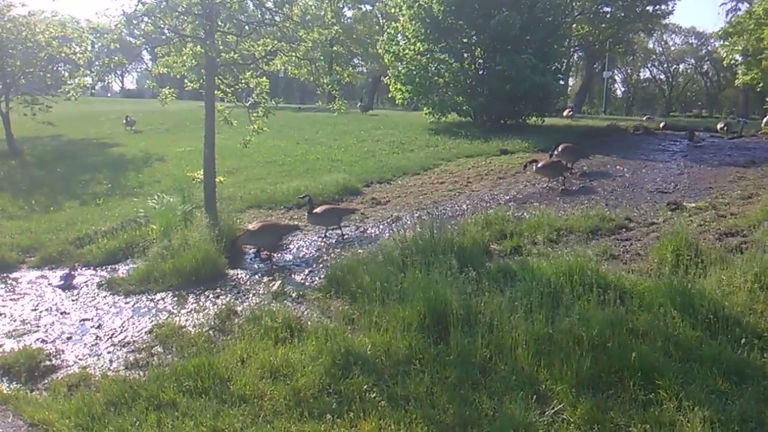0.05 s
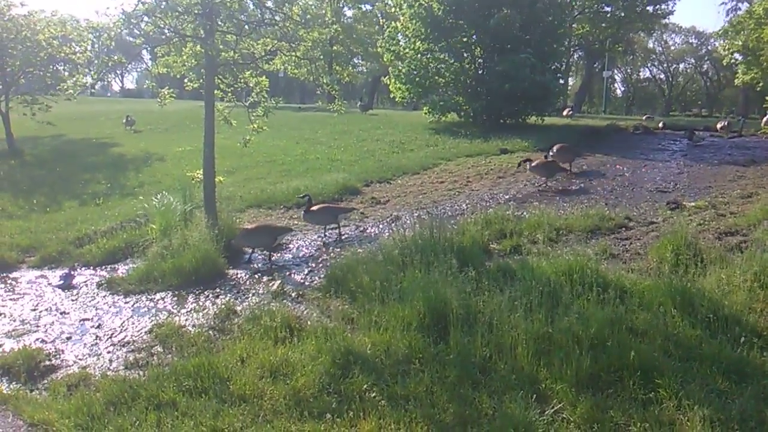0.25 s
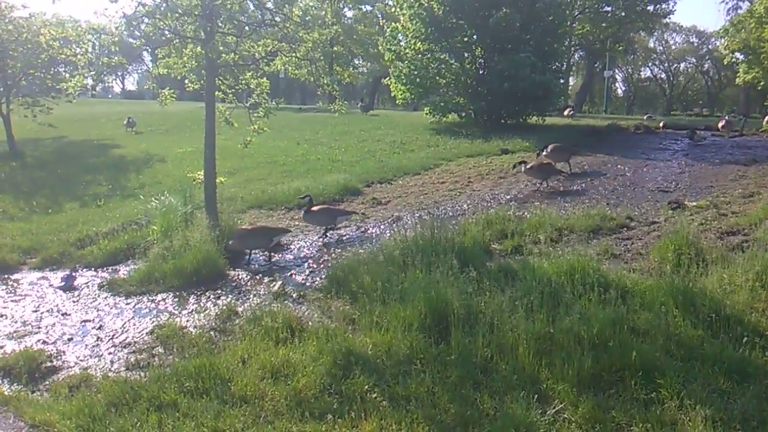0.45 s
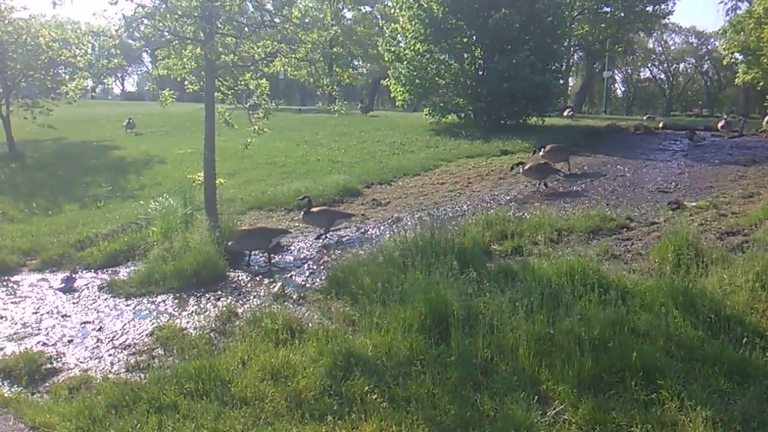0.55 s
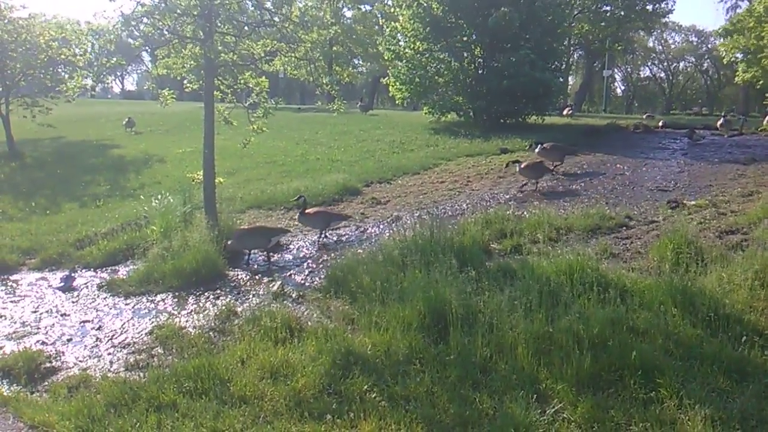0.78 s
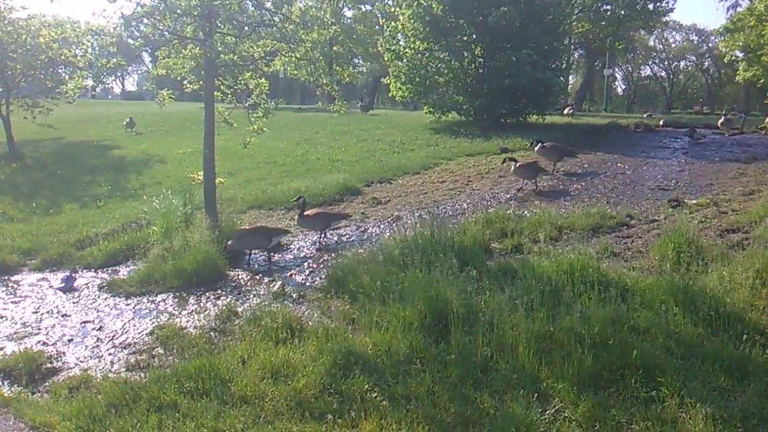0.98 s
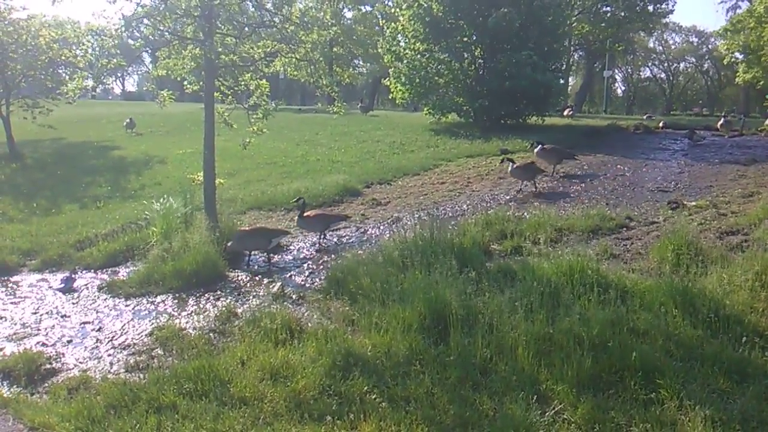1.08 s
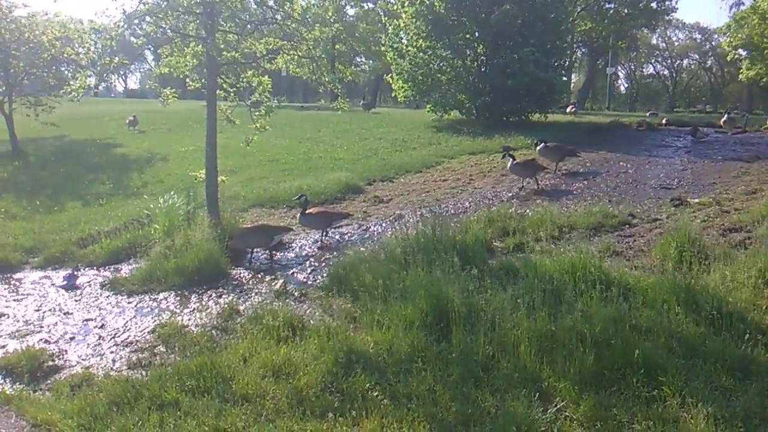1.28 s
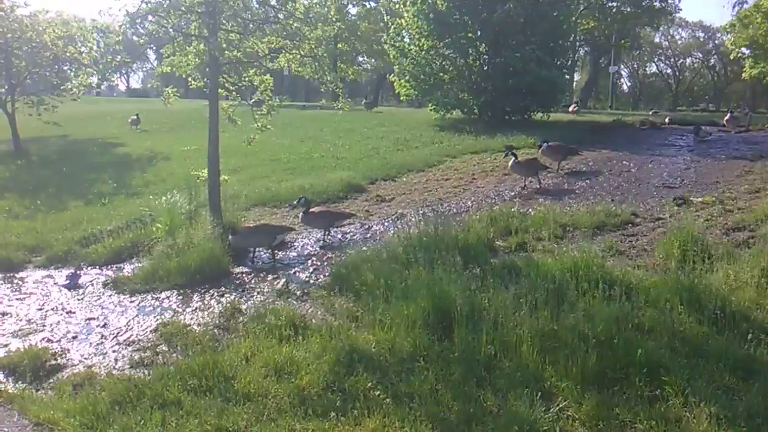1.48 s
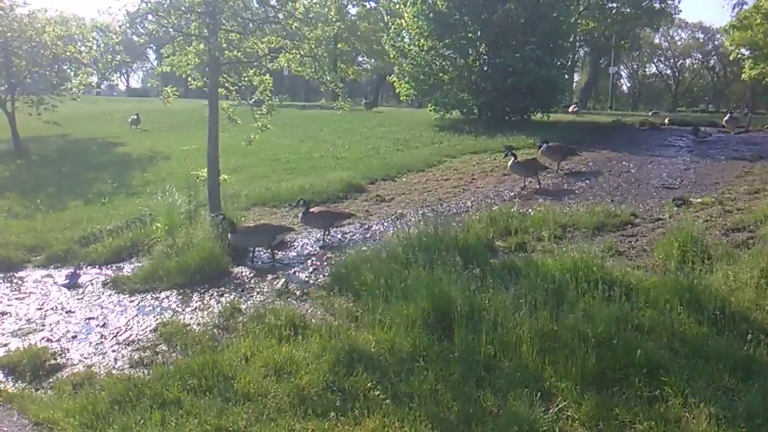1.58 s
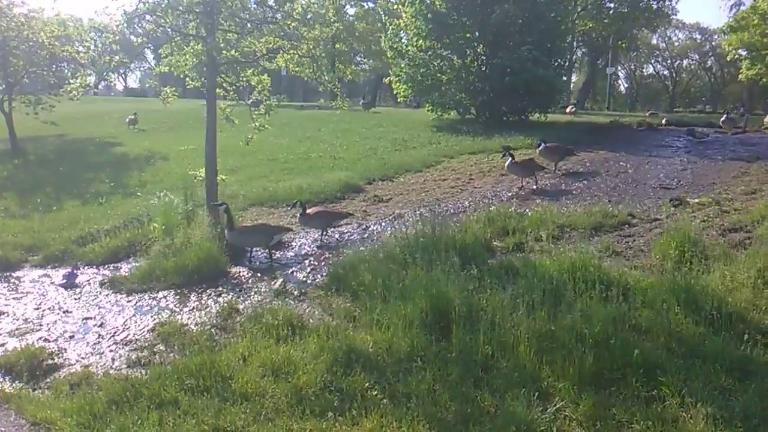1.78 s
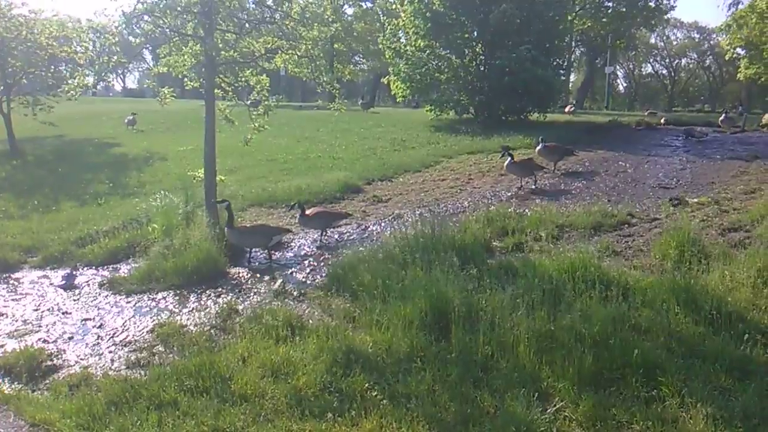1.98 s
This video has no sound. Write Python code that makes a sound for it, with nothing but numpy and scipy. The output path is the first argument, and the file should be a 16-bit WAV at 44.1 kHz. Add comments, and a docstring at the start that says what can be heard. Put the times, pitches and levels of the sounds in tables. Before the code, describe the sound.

Faint birds chirp across a quiet park, mostly to the left, growing busier halfway through. Low wind puffs bump the microphone early, with a soft rustle and small ticks, then return near the end over a soft rumble.

```python
"""Distant songbirds whistle, warble and buzz in a quiet park by a muddy stream; another bird gives dry
chacks, noisy pulses through its throat. The trees return a faint echo. Puffs of wind thump on the two
microphone ports, mostly the right one. Close by are a soft rustle and a few small ticks; behind it all
lie a far-off rumble with faint low notes and a thin hiss."""
import sys
import numpy as np
from scipy import signal
from scipy.fft import rfft, irfft, next_fast_len
from scipy.io import wavfile
from scipy.ndimage import map_coordinates

SR = 44100
rng = np.random.default_rng(int(sys.argv[2]) if len(sys.argv) > 2 else 0)


def to_wav(sig):
    """Store sig (one row per channel, or 1-D mono) as 16-bit WAV at the path in sys.argv[1].

    Samples outside -1..1 are clipped; the rate is SR.
    """
    pcm = np.clip(np.atleast_2d(sig), -1, 1) * 32767
    pcm = np.round(pcm).astype(np.int16)
    wavfile.write(sys.argv[1], SR, pcm.T)  # frames by channels


N = 90404
SONG_LEAD_S, CHACK_LEAD_S, RUMBLE_LEAD_S = 0.000385, -0.000115, 0.000135  # left port ahead of right


def amp(db):
    return 10 ** (np.asarray(db) / 20)


def unit(x):
    """x scaled to rms 1."""
    return x / np.sqrt(np.mean(x ** 2) + 1e-20)


def colour(points):
    """Gain against frequency from (f/Hz, level/dB) points on a log axis."""
    f, db = np.transpose(points)
    return lambda hz: amp(np.interp(np.log(hz + 1), np.log(f), db))


def band(centre_hz, width_hz):
    """Gain against frequency of a round-shouldered band."""
    return lambda hz: 1 / (1 + (2 * (hz - centre_hz) / width_hz) ** 4)


def filtered(x, response):
    """x through a filter given as gain against frequency."""
    n = x.shape[-1]
    padded = next_fast_len(n + 8192)
    return irfft(rfft(x, padded) * response(np.fft.rfftfreq(padded, 1 / SR)), padded)[..., :n]


def noise(response, size=16384):
    """Coloured noise of rms 1."""
    return unit(filtered(rng.standard_normal(size), response))


def wobble(t, rate):
    """A smooth random curve, rate knots a second."""
    return map_coordinates(rng.standard_normal(256), [t * rate], mode="wrap")


def clock(length):
    """Sample times of one short event, in seconds."""
    return np.arange(int(np.clip(length * SR, 64, 16000))) / SR


def swell(t, rise, fall):
    """Attack, hold and release; rise and fall are shares of the note."""
    progress = t / t[-1]
    attack = np.sin(np.pi / 2 * np.clip(progress / rise, 0, 1))
    release = np.sin(np.pi / 2 * np.clip((1 - progress) / fall, 0, 1))
    return attack * release


def pan(db):
    """Left and right gains of unit mean power, the left louder by db."""
    return unit(amp([db / 2, -db / 2]))


def lead(x, lead_s):
    """Sound from one side reaches the left port earlier by lead_s."""
    return filtered(x, lambda hz: np.exp(1j * np.pi * lead_s * np.array([hz, -hz])))


def add(out, start, sound, gains):
    """Mix a mono sound into the stereo track at start seconds."""
    i = round(start * SR)
    sound = sound[max(-i, 0):max(N - i, 0)]
    out[:, max(i, 0):max(i, 0) + len(sound)] += np.outer(gains, sound)


def background(width=0.33):
    """A far rumble, nearly alike at both ports, and a smooth hiss, unrelated between them."""
    # spectra of the rumble and the hiss: f/Hz, density/dB
    rumble_spectrum = [(20, -5.5), (40, -6.5), (62, -4), (88, 2.5), (125, -8.5), (200, -15), (380, -18.5),
                       (600, -27), (1000, -32), (1500, -48.5), (3000, -92.5)]
    hiss_spectrum = [(300, 3), (1200, 4), (1600, -0.5), (2200, 2), (3000, 1.5), (4300, -2), (5500, -1),
                     (7200, -3), (8800, 2), (10500, 3), (12000, -5.5), (14000, -10)]
    # the hiss leans left: f/Hz, left over right/dB
    hiss_balance = [(1000, 1), (2500, 3), (9000, 3.5)]
    mid, side = [noise(colour(rumble_spectrum), size=N) for _ in range(2)]
    left, right = [noise(colour(hiss_spectrum), size=N) for _ in range(2)]
    rumble = unit(np.array([mid + width * side, mid - width * side]))
    rumble_db = -58.5 - 0.2 * wobble(np.arange(N) / SR, rate=6.43)
    hiss = unit(np.array([filtered(left, colour(hiss_balance)), right]))
    return amp(rumble_db) * lead(rumble, RUMBLE_LEAD_S) + amp(-70.5) * hiss


def low_notes():
    """Blurred, hollow notes far off to the left, barely above the rumble."""
    # noise-band notes: t/s, length/s, centre/Hz, width/Hz, level/dB
    notes = [(.9, 0.038, 367, 89, -69.5), (1.03, .11, 373, 159, -65.5), (1.085, 0.11, 1044, 393, -72.5),
             (1.19, 0.096, 1140, 250, -77), (1.195, 0.026, 317, 71, -61), (1.28, 0.075, 887, 89.5, -76),
             (1.78, 0.083, 342, 151, -66.5), (1.905, 0.085, 315, 126, -64.5)]
    out = np.zeros((2, N))
    for start, length, centre_hz, width_hz, db in notes:
        t = clock(length)
        note = unit(noise(band(centre_hz, width_hz))[:len(t)])
        add(out, start, amp(db) * note * swell(t, rise=0.24, fall=0.42), pan(db=8))
    return lead(out, RUMBLE_LEAD_S)


def rustles(rough_db=1.5, grain_hz=400):
    """Brief grainy rustles near the microphone during the first gust."""
    # soft noise bursts: t/s, length/s, centre/Hz, width/Hz, level/dB
    bursts = [(0.203, 0.053, 1920, 2630, -68.5), (0.241, 0.079, 3500, 3230, -69.5),
              (0.247, .1, 9500, 3800, -69)]
    out = np.zeros((2, N))
    for start, length, centre_hz, width_hz, db in bursts:
        t = clock(length)
        level = amp(db + rough_db * wobble(t, grain_hz)) * swell(t, rise=0.55, fall=0.4)
        for gains in np.diag(pan(db=6)):  # each port gets its own noise
            add(out, start, level * unit(noise(band(centre_hz, width_hz))[:len(t)]), gains)
    return out


def ticks(attack_s=0.00033):
    """Small dry clicks, close on the left, that die at once."""
    # clicks: t/s, level of half the peak/dB, centre/Hz, width/Hz, t60/s
    clicks = [(0.2627, -58.5, 2780, 2180, 0.034), (0.3105, -61, 3330, 820, 0.06),
              (0.3117, -61.5, 8500, 6000, 0.013), (0.4694, -58, 3520, 950, 0.012),
              (.914, -67, 3130, 1200, 0.0072), (1.89, -56.5, 2670, 900, 0.024)]
    out = np.zeros((2, N))
    for start, db, centre_hz, width_hz, t60 in clicks:
        t = clock(t60)
        envelope = amp(-60 * t / t60) * (1 - np.exp(-t / attack_s))
        click = noise(band(centre_hz, width_hz))[:len(t)] * envelope
        add(out, start, 2 * amp(db) * click / np.abs(click).max(), pan(db=10))
    return out


def wind(low_slope=1.33, high_slope=2.81, port_top_hz=444):
    """Each puff shakes one microphone port; smaller eddies sound higher."""
    # wind puffs: peak t/s, length/s, level/dB, eddy f/Hz, port (0 left, 1 right)
    puffs = [(.0, .04, -42, 77, 1), (0.199, 0.073, -44, 93, 1), (.236, 0.049, -23.5, 86, 1),
             (0.252, 0.054, -28.5, 157, 1), (0.31, 0.14, -43, 135, 1), (0.322, 0.034, -38, 65.5, 1),
             (.38, 0.092, -44, 73.4, 1), (.527, 0.0437, -46, 63.6, 1), (1.062, .022, -44, 184, 1),
             (1.363, 0.039, -41, 176, 1), (1.406, 0.049, -42.5, 72.5, 1), (1.506, 0.085, -47, 130, 1),
             (1.565, 0.071, -43, 65, 1), (1.651, 0.044, -36.5, 154, 1), (1.689, 0.095, -40, 225, 1),
             (1.711, 0.092, -32, 72.4, 1), (.32, 0.11, -54, 80, 0), (0.406, .07, -54.5, 82, 0),
             (1.161, .11, -54.5, 73, 0), (1.278, 0.059, -60, 75, 0), (1.481, 0.067, -48.5, 79, 0),
             (1.627, 0.059, -46, 73.6, 0), (1.756, 0.054, -43.5, 72, 0)]
    out = np.zeros((2, N))
    for peak, length, db, eddy_hz, port in puffs:
        def eddy_at_port(hz):
            ratio = hz / eddy_hz
            eddy = ratio ** low_slope / (1 + ratio ** (low_slope + high_slope))
            return eddy / np.hypot(1, (hz / port_top_hz) ** 3)

        n = len(clock(length))
        turbulence = noise(eddy_at_port)[-n - 2048:][:n]
        puff = unit(turbulence * np.hanning(n))
        add(out, peak - length / 2, amp(db) * puff, [port == 0, port == 1])
    return out


def tree_echo(x, t60=0.31, build_s=0.0074):
    """A thin diffuse echo from the trees."""
    t = np.arange(SR // 2) / SR
    tail = rng.standard_normal((2, len(t))) * amp(-60 * t / t60) * (1 - np.exp(-t / build_s))
    return signal.fftconvolve(x, tail / np.linalg.norm(tail[0]), axes=1)[:, :N]


def chatter(count=18, pitch_hz=3100, spread=0.21):
    """Blurred chirps of the farthest birds, at random times and pitches."""
    out = np.zeros((2, N))
    n = len(clock(length=0.048))
    for when, pitch in rng.random((count, 2)):
        centre_hz = pitch_hz * (1 + spread * (2 * pitch - 1))
        chirp = noise(band(centre_hz, width_hz=500))[:n] * np.hanning(n)
        add(out, when * N / SR, amp(-79) * chirp, pan(db=-1))
    return out


def chacks(pulse_hz=85, pulse_decay=0.93):
    """A bird left of centre sends uneven noisy pulses through gliding throat resonances."""
    # dry calls: t/s, length/s, level/dB, pan/dB, share by which the resonances rise
    calls = [(0.132, 0.016, -71.5, 10, 0.073), (0.514, 0.043, -70, 6, 0.29),
             (0.772, 0.032, -71.5, 6, 0.035), (0.901, .058, -62, 5.5, -0.031),
             (1.223, 0.036, -63, 6, 0.196), (1.62, 0.041, -67.5, 2.5, 0.068),
             (1.877, 0.043, -63.5, 3.5, 0.11)]
    # throat resonances: f/Hz, gain/dB
    throat = [(900, -37), (1350, -19), (1650, 1), (1950, -3), (2250, -4), (2550, -6), (3000, -15.5),
              (4000, -10), (6000, -56)]
    out = np.zeros((2, N))
    for start, length, db, pan_db, glide in calls:
        t = clock(length)
        cycle = (pulse_hz * t + 0.14 * wobble(t, pulse_hz)) % 1
        pulses = rng.standard_normal(16384)[:len(t)] * np.exp(-pulse_decay * cycle)
        rasp = filtered(pulses, colour(throat))
        warped_t = t + glide * t * (t / t[-1] - 1) / 2  # changing speed slides the resonances
        call = unit(np.interp(warped_t, t, rasp))
        add(out, start, amp(db) * call * swell(t, rise=0.15, fall=0.1), pan(pan_db))
    return out


def buzzes():
    """The songbirds' rough high notes, smeared by distance into narrow bands."""
    # buzzy notes: t/s, length/s, centre/Hz, width/Hz, level/dB, pan/dB
    notes = [(.01, 0.077, 5600, 865, -72, 8), (0.093, 0.06, 5500, 700, -79, 11),
             (0.25, 0.055, 5740, 860, -72.5, 6), (1.075, 0.062, 3880, 650, -67.5, 5),
             (1.206, 0.078, 4600, 810, -70, 4), (1.213, 0.064, 5750, 700, -74.5, 2),
             (1.271, 0.12, 4950, 770, -84, 10), (1.284, 0.059, 6700, 1300, -69, -3),
             (1.357, 0.16, 5550, 970, -72, 5), (1.396, 0.043, 4400, 596, -73, 14),
             (1.501, 0.049, 4370, 1090, -72.5, 4), (1.523, 0.041, 3620, 744, -65.5, 10),
             (1.554, 0.07, 3380, 650, -74.5, 9), (1.66, 0.22, 2920, 825, -76, 6),
             (1.838, 0.1, 3870, 650, -69.5, 5), (1.967, 0.043, 4240, 1400, -71, 10),
             (1.968, 0.083, 6870, 1310, -75.5, -16), (1.99, 0.091, 3380, 800, -66.5, 8)]
    out = np.zeros((2, N))
    for start, length, centre_hz, width_hz, db, pan_db in notes:
        t = clock(length)
        buzz = unit(noise(band(centre_hz, width_hz))[:len(t)])
        add(out, start, amp(db) * buzz * swell(t, rise=0.32, fall=0.36), pan(pan_db))
    return out


def whistles(warble_hz=87, drift=0.0037, flutter_db=3.83, flutter_hz=148.6):
    """Distant songbirds, mostly left: pure notes that glide along an arc, some with a fast warble."""
    # whistled notes: t/s, length/s, first f/Hz, middle f/Hz, last f/Hz, level/dB, warble depth/Hz, pan/dB
    notes = [(.006, 0.0194, 3750, 4280, 4380, -65.5, -3, 16), (.112, 0.03, 3850, 4100, 4200, -82, -4, 16),
             (0.379, 0.048, 3080, 3060, 3120, -76.5, 8, 14), (0.575, .026, 3440, 3380, 3370, -74.5, 95, 19),
             (0.674, 0.057, 3090, 2970, 2550, -80.5, 90, 8),
             (0.913, 0.072, 3166, 3034, 3096, -67.5, 12, 15),
             (1.022, 0.017, 3640, 3510, 3220, -72.5, -10, 3),
             (1.068, 0.068, 3045, 3320, 3375, -59, -13, 13), (1.2, 0.058, 4250, 3930, 3620, -73.5, 179, 2),
             (1.28, 0.027, 5490, 5120, 5000, -71.5, 7, -5), (1.352, 0.078, 4720, 4360, 4080, -72.5, -18, 0),
             (1.48, 0.058, 3630, 3920, 2980, -76, 45, 21), (1.54, 0.061, 2860, 2850, 2900, -73.5, 5, 6),
             (1.679, 0.063, 2478, 2830, 2540, -70, 78, 11), (1.814, 0.078, 3000, 3177, 3360, -60, 3, 5),
             (1.936, 0.038, 3380, 3650, 3610, -58.5, 0, 3.5), (1.955, 0.054, 3660, 3655, 3510, -70, 5, 10),
             (1.961, 0.038, 3490, 3100, 3050, -68, -5, 6), (1.986, 0.031, 3290, 2950, 2580, -68.5, 11, 19),
             (2.013, 0.035, 2995, 3110, 2530, -66, -4, 10), (2.03, 0.027, 3090, 3020, 3100, -65, -2, 19)]
    out = np.zeros((2, N))
    for start, length, first_hz, middle_hz, last_hz, db, depth_hz, pan_db in notes:
        t = clock(length)
        parabola = np.polyfit([0, 0.5, 1], [first_hz, middle_hz, last_hz], 2)
        arc = np.polyval(parabola, t / t[-1])
        warble = depth_hz * np.sin(2 * np.pi * warble_hz * t)
        hz = arc * (1 + drift * wobble(t, flutter_hz)) + warble
        tone = np.sqrt(2) * np.sin(2 * np.pi * np.cumsum(hz) / SR)
        level = amp(db + flutter_db * wobble(t, flutter_hz)) * swell(t, rise=0.68, fall=0.23)
        add(out, start, level * tone, pan(pan_db))
    return out


def scene():
    """The park at the microphone: far birds, their echo to the right, near sounds, wind and background."""
    song = lead(whistles() + buzzes() + chatter(), SONG_LEAD_S)
    birds = song + lead(chacks(), CHACK_LEAD_S)
    echo = amp(-8) * pan(db=-5)[:, None] * tree_echo(birds)
    return birds + echo + low_notes() + ticks() + rustles() + wind() + background()


def record(dry):
    """The microphone's slightly resonant low cut thins the deep bass; nothing passes the band limit."""
    low_cut_hz, q, top_hz = 61.8, 1.74, 14200

    def response(hz):
        s = 1j * hz / low_cut_hz
        high_pass = s * s / (s * s + s / q + 1)
        return high_pass * (hz < top_hz)

    return filtered(dry, response)


dry = scene()
out = record(dry)
to_wav(out)
```